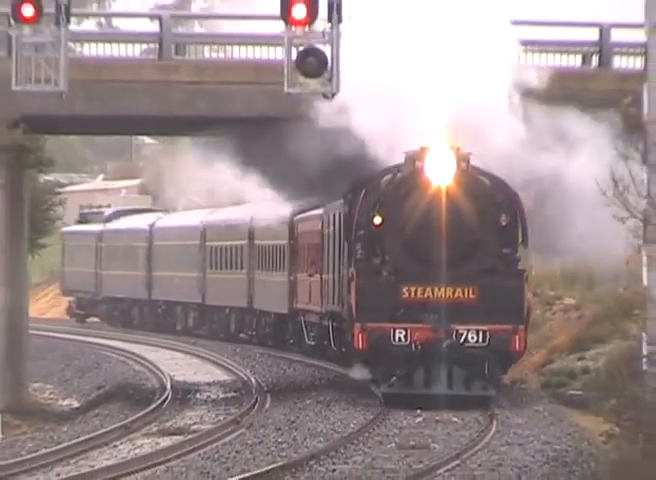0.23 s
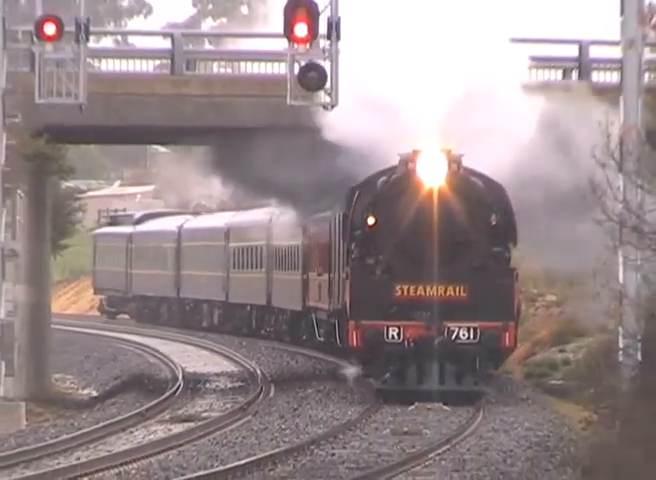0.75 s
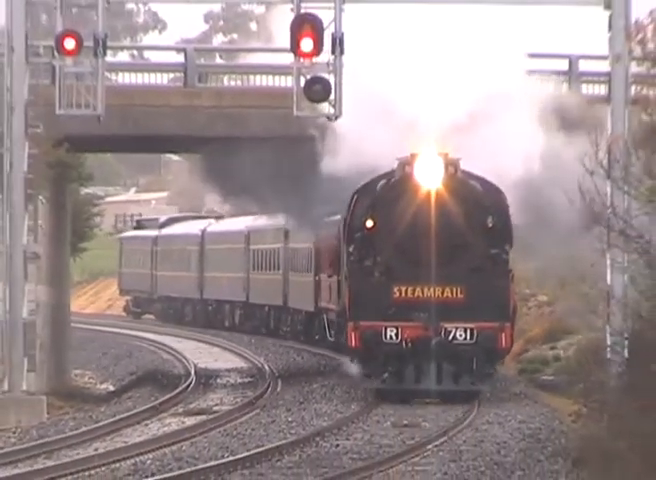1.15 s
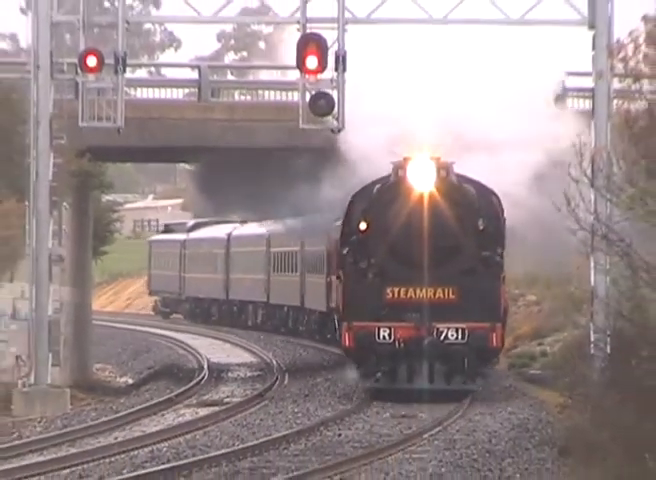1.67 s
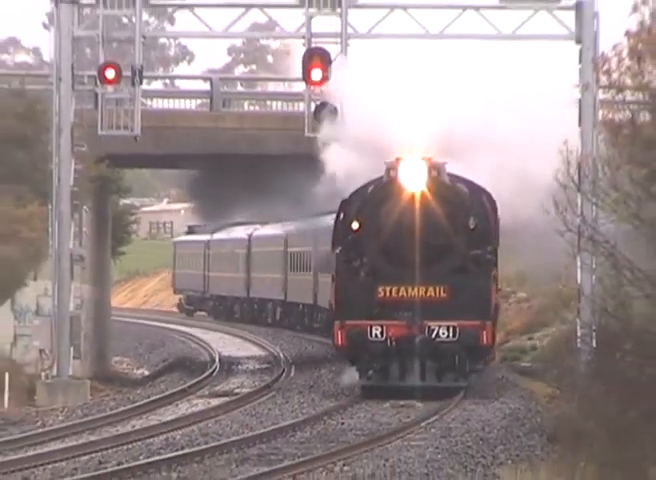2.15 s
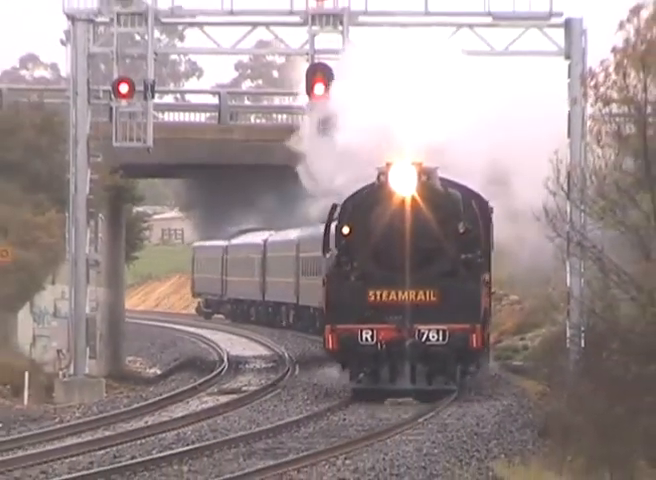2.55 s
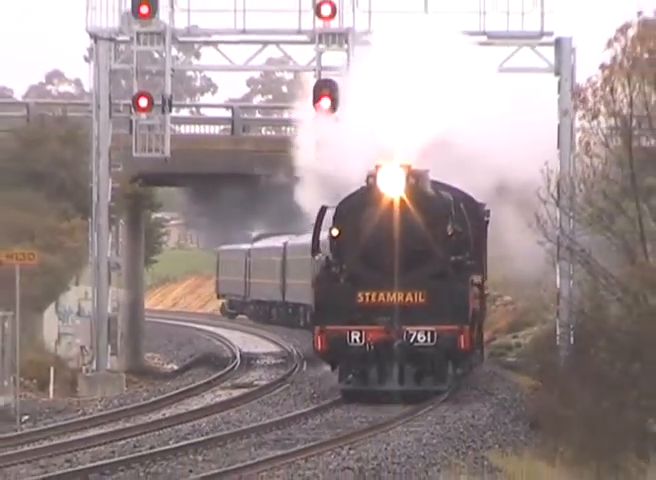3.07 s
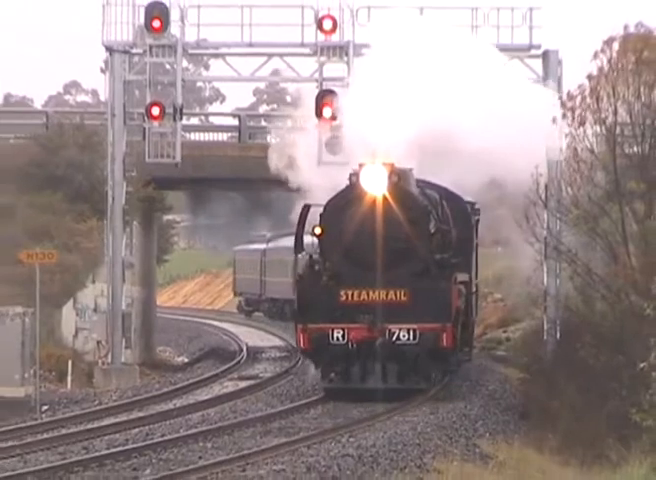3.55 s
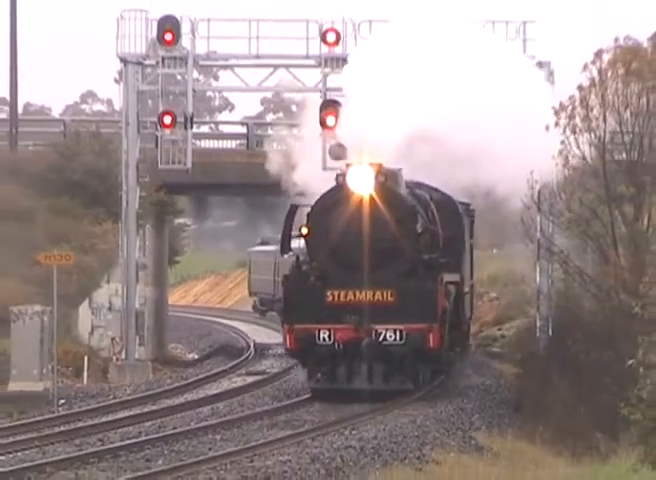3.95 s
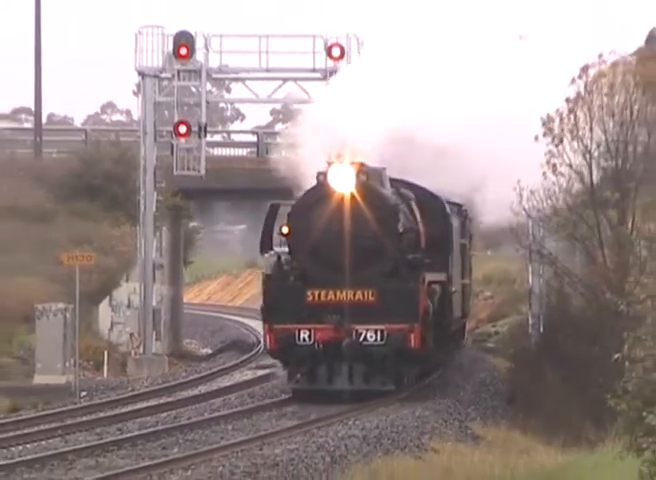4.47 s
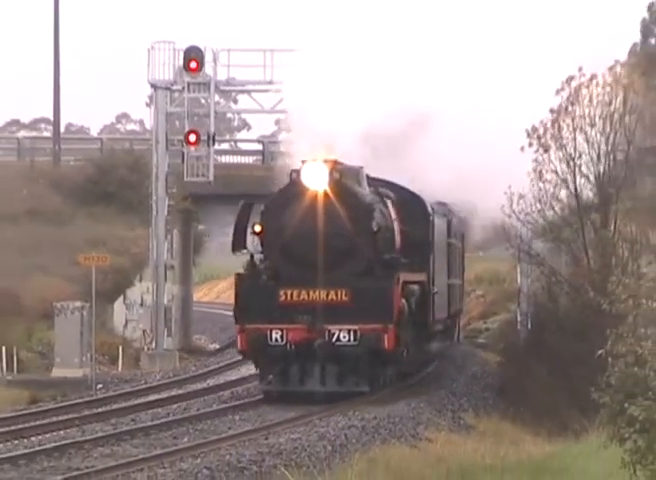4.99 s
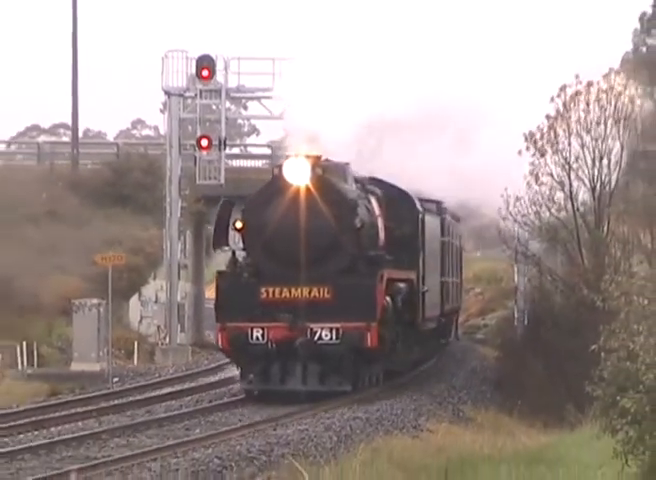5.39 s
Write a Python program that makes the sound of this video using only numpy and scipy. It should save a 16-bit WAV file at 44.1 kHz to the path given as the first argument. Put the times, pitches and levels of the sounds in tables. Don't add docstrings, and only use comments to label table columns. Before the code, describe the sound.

Outdoors by a curved track, a steam locomotive approaches a small stereo camera microphone. Dense steam hiss pulses unevenly over a hollow chimney roar and bass rumble. Wind buffets the microphone, a bird chirps faintly near the start, and the steam grows brighter and louder towards the end with soft rail thumps and brief water spits.

```python
import sys
import numpy as np
from scipy import signal
from scipy.fft import rfft, irfft, next_fast_len
from scipy.io import wavfile
from scipy.ndimage import uniform_filter1d

SR = 44100
rng = np.random.default_rng(int(sys.argv[2]) if len(sys.argv) > 2 else 0)


def store_wav(level_fs):
    pcm = np.round(np.clip(np.atleast_2d(level_fs), -1, 1) * 32767)
    wavfile.write(sys.argv[1], SR, pcm.T.astype(np.int16))


def natural_amplitude(level_db):
    exponent = np.asarray(level_db, float) / 20
    return 10 ** exponent


N = 248283
TIME_S = np.arange(N) / SR
PAD = next_fast_len(N + 4096)
HZ = np.maximum(np.arange(PAD // 2 + 1) * SR / PAD, 1)
SOLID_TOP_HZ = 11020

# time_s, flow_db (level of the roar), aim_db (treble share as it swings towards the ports)
JET = [(0, -28.5, -8.5), (.45, -29, -7.5), (.95, -29, -8), (1.25, -28, -7), (1.44, -28.5, -7),
       (1.6, -28.5, -6.5), (1.74, -25.5, -8.5), (2.02, -26.5, -8), (2.8, -28, -7.5), (3.5, -27.5, -7.5),
       (4.0, -26.5, -6.5), (4.25, -23.5, -7), (4.45, -23, -7.5), (4.64, -21, -7.5), (5.0, -22, -6.5),
       (5.3, -22.5, -6.5), (5.43, -22.5, -6), (5.63, -21, -6)]


def in_time(rows):
    s, *columns = np.transpose(rows)
    return [np.interp(TIME_S, s, column) for column in columns]


def at_hz(points, hz):
    point_hz, value = np.transpose(points)
    return np.interp(np.log(hz), np.log(point_hz), value)


def drift(rate):
    r = np.exp(-128 * np.pi * rate / SR)
    slow = signal.lfilter([1], [1, -2 * r, r * r], rng.standard_normal(N // 64 + 2002))[2000:]
    return np.interp(np.arange(N) / 64, np.arange(len(slow)), slow / slow.std())


def coloured(spectrum):
    noise = rfft(rng.standard_normal(PAD)) * natural_amplitude(at_hz(spectrum, HZ))
    return noise / np.std(irfft(noise, PAD))


def evened(x, size):
    power = np.mean(np.atleast_2d(x) ** 2, axis=0)
    return x / np.sqrt(uniform_filter1d(power, size=size) + 0.26)


def from_engine(spectrum):
    # pitch_hz, left_minus_right_db
    lean_curve = [(60, 6), (200, 2.5), (450, 4.5), (800, 1.1), (1500, 0.5), (2500, 0.1), (4000, -1),
                  (6000, -2)]
    # pitch_hz, scattered_share_db
    diffuse_curve = [(40, -11), (150, -11), (400, -10), (900, -13.5), (1800, -17.5), (2400, -14.5),
                     (3500, -12.5), (6000, -10)]
    lag_curve = [(600, 10), (1900, 5), (2400, 10), (3500, 12), (4500, 18), (6200, 23)]
    lean = natural_amplitude(at_hz(lean_curve, HZ) / 2)
    lag_s = at_hz(lag_curve, HZ) / 1.3e6
    direct = coloured(spectrum) * [lean, np.exp(-2j * np.pi * HZ * lag_s) / lean]
    scattered = coloured(spectrum) * natural_amplitude(at_hz(diffuse_curve, HZ))
    return direct + scattered * [[1], [-1]]


def in_bands(stereo, centres_hz, level_db, patchy_db, patch_rate, shared_db, shared_rate):
    out = 0
    together_db = shared_db * drift(shared_rate)
    for k, hz in enumerate(centres_hz):
        window = np.interp(np.log(HZ), np.log(centres_hz), np.arange(len(centres_hz)) == k)
        gain = natural_amplitude(level_db(hz) + together_db + patchy_db * drift(patch_rate))
        out = out + gain * irfft(stereo * window, PAD)[:, :N]
    return out


def puffs(events, spectrum, rise_s, fall_s):
    shape = 0
    for peak_s, db in events:
        age = TIME_S - peak_s
        shape = shape + natural_amplitude(db) * np.exp(-np.where(age < 0, -age / rise_s, age / fall_s))
    return shape * evened(irfft(from_engine(spectrum), PAD)[:, :N], size=600)


def steam():
    # pitch_hz, density_db (per Hz)
    jet_colour = [(650, -30.5), (1100, -12), (1300, -6.5), (1520, -2), (2000, -1.5), (2400, 0.5),
                  (2800, -0.5), (3120, -3.5), (3700, -5), (4300, -3.5), (7000, -8.5), (9600, -14),
                  (10900, -20), (12600, -27)]
    # centre_s, gain_db, half_length_s, pitch_hz
    beats = [(.11, 3.5, 0.1, 1400), (0.322, 3, 0.11, 2000), (1.3, 3, 0.032, 2400), (1.44, 3.5, .07, 1490),
             (1.494, 3, 0.12, 4000), (1.88, 2.5, 0.092, 2480), (2.1, 0.5, 0.055, 2000),
             (2.5, 2, 0.12, 1400), (2.76, 1, .06, 1400), (3.18, 1, 0.13, 2400), (3.772, 2.5, 0.12, 2320),
             (4.067, 3, .07, 2240), (4.38, 1, 0.13, 5000), (4.423, 3.5, .07, 1360), (4.556, 3, 0.038, 1900),
             (4.69, 3, 0.14, 1800), (5.175, 3, .05, 2240), (5.32, 2.5, 0.072, 1400),
             (5.597, 0.5, 0.077, 2600), (.77, 2.5, .07, 5500), (3.36, 2, .08, 5500), (3.922, 1, .07, 2880),
             (4.3, -0.5, 0.079, 3000), (4.64, 5.5, 0.055, 8800), (5.2, 1, 0.089, 9600),
             (1.72, 4.5, .08, 9500), (1.62, 1.5, 0.085, 3750), (5.554, 1, 0.052, 7000),
             (2.95, 0.5, 0.072, 3200)]
    beat_half_octaves = 0.42
    flow_db, aim_db = in_time(JET)
    aim_db = aim_db - aim_db.mean()
    low_db = 0.041 * (flow_db - flow_db.mean())
    swells = np.array([db * np.exp(-((TIME_S - s) / half_s) ** 2) for s, db, half_s, _ in beats])
    beat_hz = np.array(beats)[:, 3]

    def level_db(hz):
        octaves = np.log2(hz / 2400)
        low_share = np.interp(octaves, [-.6, -.2], [1, 0])
        sizzle_share = np.interp(octaves, [0.2, .8, 1.8], [0, 1, 0])
        top_share = np.interp(octaves, [.9, 1.8], [0, 1])
        beats_db = np.exp(-(np.log2(hz / beat_hz) / beat_half_octaves) ** 2) @ swells
        bright_db = (0.65 * sizzle_share + 2.7 * top_share) * aim_db
        return flow_db + 0.32 + beats_db + low_share * low_db + bright_db

    centres_hz = np.geomspace(1100, 11000, num=11)
    return in_bands(from_engine(jet_colour), centres_hz, level_db,
                    patchy_db=.65, patch_rate=12.0, shared_db=.4, shared_rate=16.0)


def exhaust():
    # time_s, draught_db
    draught = [(0, -35.5), (.35, -34.5), (.8, -37.5), (1.1, -37.5), (1.5, -35.5), (2.0, -35), (2.5, -35.5),
               (2.95, -35.5), (3.5, -38), (4.0, -37.5), (4.25, -36), (4.6, -33.5), (5.2, -34), (5.4, -31.5),
               (5.63, -33.5)]
    # pitch_hz, density_db (per Hz)
    chimney_colour = [(140, -49), (230, -6), (307, -5), (423, -7), (892, -1), (1300, -5), (1690, -17.5),
                      (2860, -120)]
    draught_db, = in_time(draught)
    bridge_db = 2.5 * np.exp(-((TIME_S - 3.24) / 2.05) ** 2)
    hollow_db = bridge_db - 1.0 - 0.42 * (draught_db - draught_db.mean())
    return in_bands(from_engine(chimney_colour), [240, 440, 750, 1050],
                    lambda hz: draught_db + (hz < 500) * hollow_db,
                    patchy_db=.9, patch_rate=4.0, shared_db=.2, shared_rate=8.0)


def rolling():
    # time_s, level_db
    wheel_load = [(0, -49), (0.6, -46), (1.0, -45.5), (1.6, -45.5), (2.5, -44), (3.1, -45), (3.5, -48.5),
                  (4.25, -43.5), (4.7, -46), (5.2, -46), (5.63, -45.5)]
    # pitch_hz, density_db (per Hz)
    rumble_colour = [(18, -37), (30, -13.5), (81, -4.5), (172, 1.5), (230, -8.5), (300, -33), (510, -120)]
    load_db, = in_time(wheel_load)
    upper_db = -3.2 + 1.5 * TIME_S - 0.47 * (load_db - load_db.mean())
    rumble = from_engine(rumble_colour)
    crossover = np.interp(np.log(HZ), np.log([90, 130]), [0, 1])
    deep = irfft(rumble * (1 - crossover), PAD)[:, :N]
    upper = irfft(rumble * crossover, PAD)[:, :N]
    deep = natural_amplitude(load_db + 2.5) * evened(deep / deep.std(), size=8000)
    return deep + natural_amplitude(load_db + upper_db) * evened(upper / upper.std(), size=8000)


def wind():
    # peak_s, peak_db, rise_s and fall_s (each over 20 dB), flutter_db (above the buffet)
    gusts = [(0.24, -24, .045, 0.029, -14), (0.58, -32, .07, .3, -2), (0.66, -36, .1, 0.3, -9),
             (0.93, -27, 0.11, .15, -4), (1.09, -32, 0.18, 0.082, 3), (1.3, -41, .09, .45, -5),
             (1.61, -26, .04, .08, -13), (1.7, -29, 0.11, 0.064, -12), (1.86, -38, .25, .11, -7),
             (2.11, -30, .05, 0.17, -11), (2.3, -32, 0.22, .2, -9), (2.6, -24, 0.074, .045, -8),
             (2.82, -40, .3, 0.18, -10), (3.12, -21, 0.064, .08, -5), (3.06, -39, .3, .1, -2),
             (3.52, -28, .04, .11, -17), (3.99, -33, .03, .07, -20), (4.11, -22, .08, .14, -12),
             (4.76, -29, .08, .15, -17), (4.94, -32, .14, .15, -17), (5.05, -14, 0.094, 0.13, -3),
             (5.14, -28, .12, .13, -15), (5.46, -30, 0.17, .09, -9), (5.63, -29, 0.083, .1, -3)]
    # pitch_hz, density_db (per Hz)
    buffet_colour = [(10, -14), (25, 10), (50, 25), (90, 6), (150, -34)]
    # pitch_hz, density_db (per Hz)
    flutter_colour = [(70, -10), (110, 4), (170, -7), (240, -14), (330, -28), (500, -41)]
    deep = upper = natural_amplitude(-55)
    for peak_s, db, rise_s, fall_s, flutter_db in gusts:
        age = TIME_S - peak_s
        gust = natural_amplitude(db - 20 * np.where(age < 0, -age / rise_s, age / fall_s))
        deep = deep + gust
        upper = upper + natural_amplitude(flutter_db) * gust
    buffet = evened(irfft(coloured(buffet_colour), PAD)[:N], size=2600)
    flutter = evened(irfft(coloured(flutter_colour), PAD)[:N], size=2600)
    return (deep * buffet + upper * flutter) * natural_amplitude([[.2], [-.2]]) * [[1], [-1]]


def bird():
    # time_s, pitch_hz, level_db
    chirp = [
        (0.52, 6400, -75),
        (0.53, 6250, -43),
        (0.555, 6650, -39),
        (0.572, 7150, -41),
        (0.59, 6700, -36),
        (0.602, 6550, -75),
    ]
    hz, level_db = in_time(chirp)
    return natural_amplitude(level_db) * (level_db > -74) * np.sin(2 * np.pi * np.cumsum(hz) / SR)


def rail_joints():
    # start_s, peak_db, pitch_hz
    thumps = [(.84, -46, 106), (1.975, -34, 90), (2.591, -33, 70), (2.869, -35, 70), (4.05, -37, 139),
              (4.33, -30, 91), (4.51, -36, 80), (4.685, -30, 125), (4.81, -30.5, 75), (4.895, -29, 105),
              (4.895, -30, 180), (4.968, -28, 130), (5.07, -31, 121), (5.201, -34, 164), (5.37, -33, 202),
              (5.499, -33, 110)]
    swell_s = 0.0078
    out = 0
    for start_s, db, hz in thumps:
        age = np.maximum(TIME_S - start_s, 0)
        push = age / swell_s * np.exp(1 - age / swell_s)
        out = out + natural_amplitude(db) * push * np.sin(2 * np.pi * hz * age)
    return out * natural_amplitude([[1.0], [-1.0]])


def spits():
    # peak_s, level_db
    flares = [
        (1.75, -25),
    ]
    # pitch_hz, density_db (per Hz)
    flare_colour = [(3000, -23), (4600, -0.5), (7000, -3), (10500, -17), (11500, -32)]
    # peak_s, level_db
    water_spits = [
        (4.595, -31),
        (4.63, -25),
        (4.66, -27),
        (4.692, -33),
        (5.185, -29),
        (5.55, -29),
    ]
    # pitch_hz, density_db (per Hz)
    spit_colour = [(5500, -29), (7200, -8), (9800, 10), (11200, -23)]
    flare = puffs(flares, flare_colour, rise_s=0.12, fall_s=0.11)
    return flare + puffs(water_spits, spit_colour, rise_s=.004, fall_s=.012)


def scene():
    swing_db = -.5 * np.maximum(TIME_S - 4.4, 0)
    jet = (steam() + spits()) * natural_amplitude(swing_db / 2 * [[1], [-1]])
    return jet + exhaust() + rolling() + rail_joints() + wind() + bird()


def joined_treble(x, flip_share, drop_db):
    # start_s, end_s
    top_flipped = [(1.42, 1.58), (1.9, 2.0), (2.1, 2.2), (3.1, 3.17), (3.78, 3.86), (4.46, 4.52),
                   (4.62, 4.73), (4.88, 5.0), (5.1, 5.17), (5.3, 5.4), (5.55, 5.63)]
    wide_moments = [
        0.84,
    ]
    stereo_top_hz = 6350
    hz, s, (left, right) = signal.stft(x, SR, window="cosine", nperseg=2048)
    mid_power = uniform_filter1d(abs(left + right) ** 2, size=6, axis=0)
    side_power = uniform_filter1d(abs(left - right) ** 2, size=6, axis=0)
    faint = side_power < mid_power * natural_amplitude(2 * drop_db)
    middle = (left + right) / 2
    left, right = np.where(faint, middle, left), np.where(faint, middle, right)
    band = ((hz - SOLID_TOP_HZ) // 690).astype(int) + 7
    chance = flip_share * (1 + np.arange(24)[:, None] ** 2 / 5) * (.6 + s / 6)
    sign = np.where(rng.random((24, len(s))) < chance, -1, 1)
    sign[7:] = np.where(np.any([(s > a) & (s < b) for a, b in top_flipped], axis=0), -1, 1)
    sign = sign[np.maximum(band, 0)]
    wide = np.isin(np.arange(len(s)), [np.argmin(abs(s - t)) for t in wide_moments])
    right = np.where((hz[:, None] < stereo_top_hz) | wide, right, sign * left)
    return signal.istft(np.array([left, right]), SR, window="cosine", nperseg=2048)[1][:, :N]


def ragged_top(x, spread_hz):
    hz, s, frames = signal.stft(x, SR, window="cosine", nperseg=4096)
    jet_s, flow_db, _ = np.transpose(JET)
    climb_hz = 90 * np.clip(np.interp(s, jet_s, flow_db) + 25, 0, 3)
    strips = rng.standard_normal((len(hz) // 8 + 1, len(s) // 2 + 1))
    strips = strips.repeat(8, axis=0).repeat(2, axis=1)[:len(hz), :len(s)]
    edge_hz = 11340 + climb_hz + (spread_hz + climb_hz) * strips
    kept = (hz[:, None] < SOLID_TOP_HZ) | (hz[:, None] < edge_hz)
    return signal.istft(frames * kept, SR, window="cosine", nperseg=4096)[1][:, :N]


def low_pass(x):
    return signal.sosfilt(signal.butter(12, 12520, fs=SR, output="sos"), x)


def record(dry):
    joined = joined_treble(dry, flip_share=.01, drop_db=-20)
    mix = ragged_top(joined, spread_hz=240) + .0012
    return low_pass(mix)


dry = scene()
out = record(dry)
store_wav(out)
```